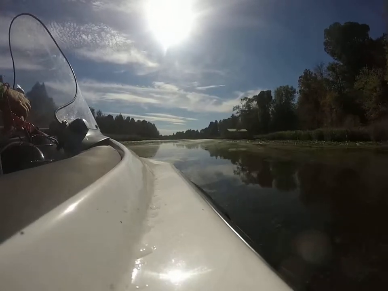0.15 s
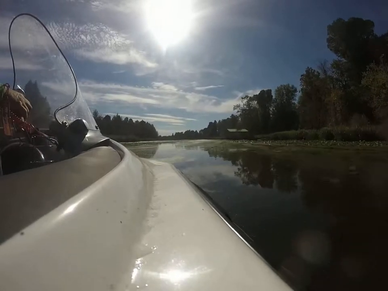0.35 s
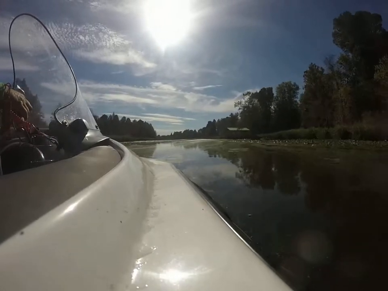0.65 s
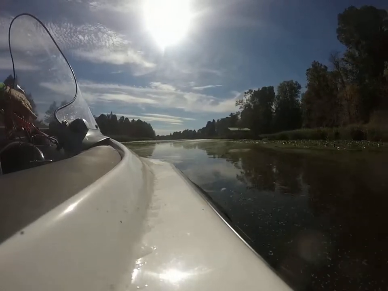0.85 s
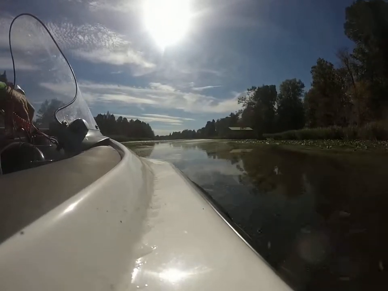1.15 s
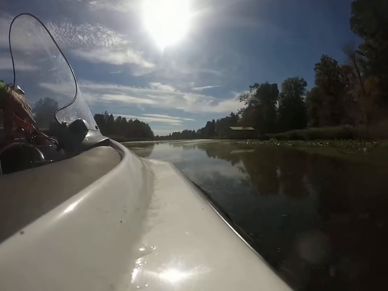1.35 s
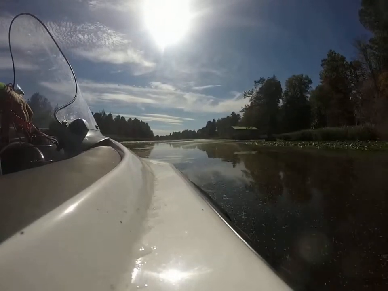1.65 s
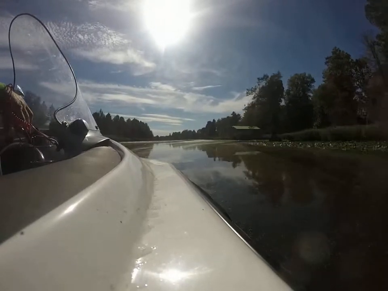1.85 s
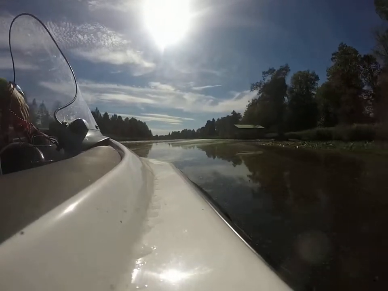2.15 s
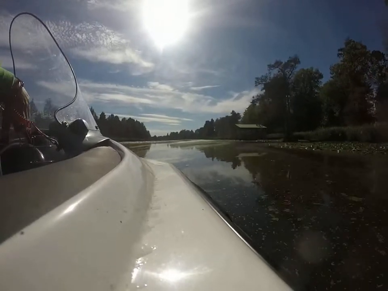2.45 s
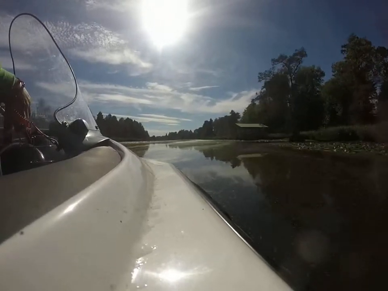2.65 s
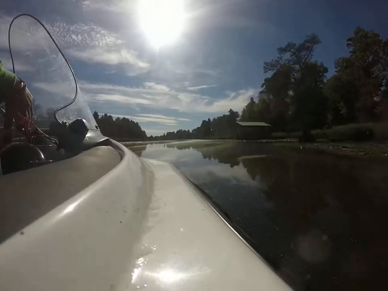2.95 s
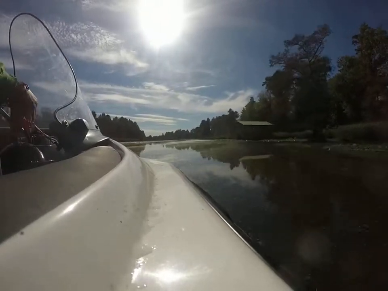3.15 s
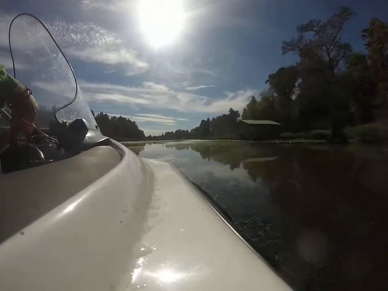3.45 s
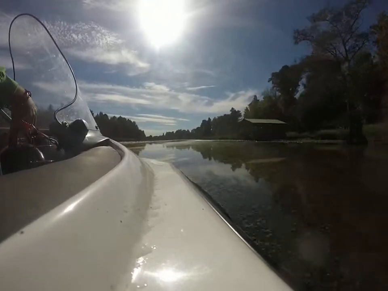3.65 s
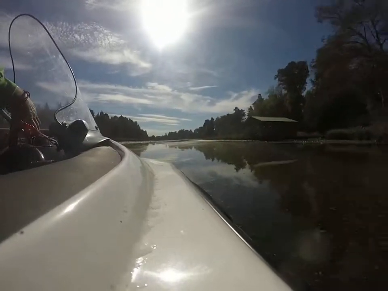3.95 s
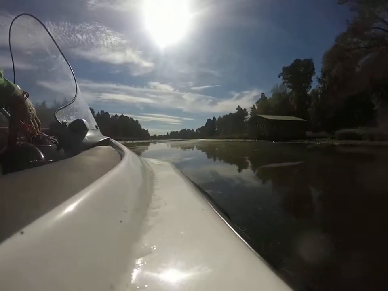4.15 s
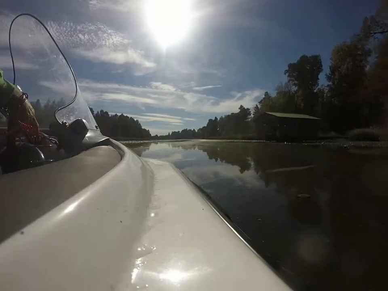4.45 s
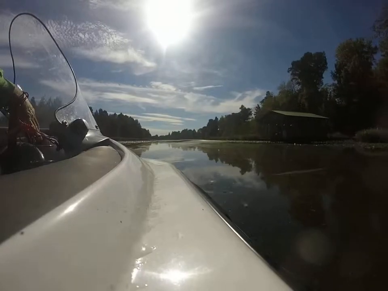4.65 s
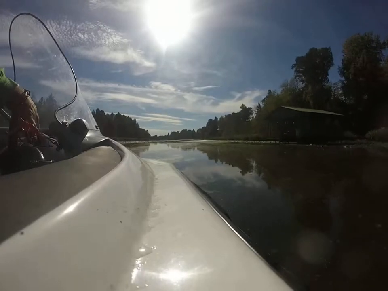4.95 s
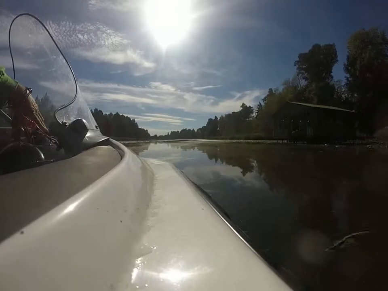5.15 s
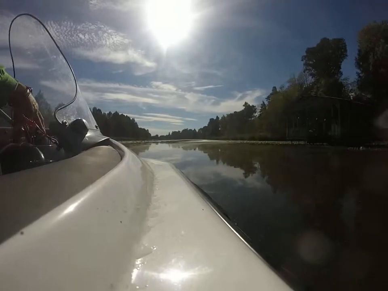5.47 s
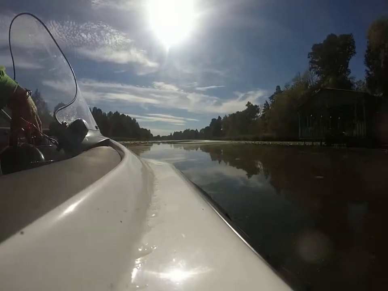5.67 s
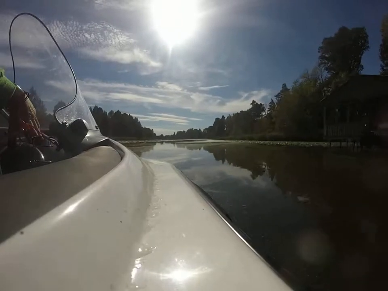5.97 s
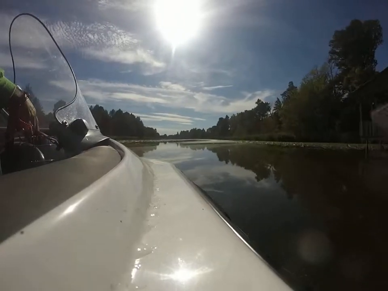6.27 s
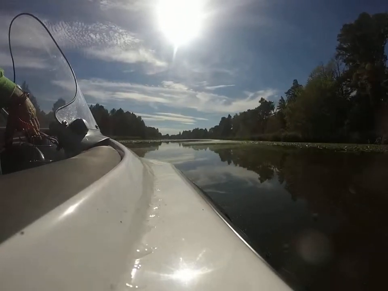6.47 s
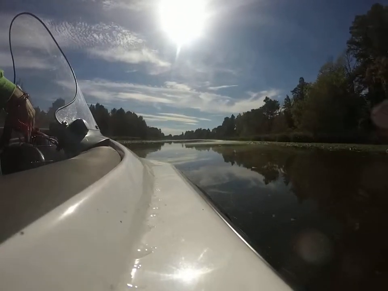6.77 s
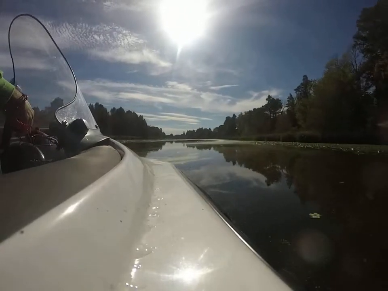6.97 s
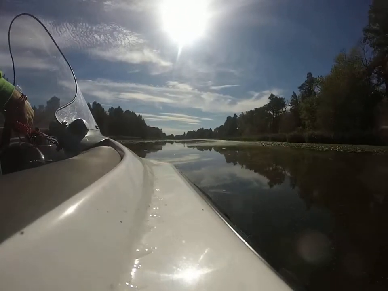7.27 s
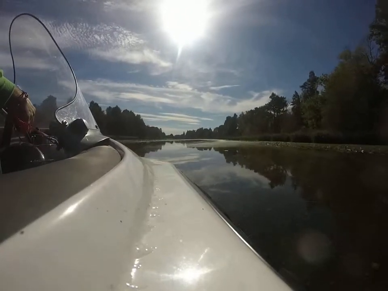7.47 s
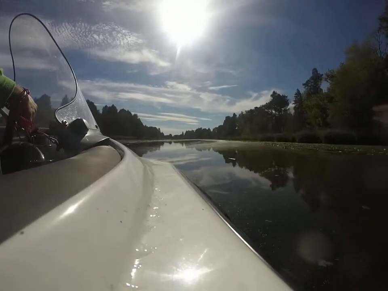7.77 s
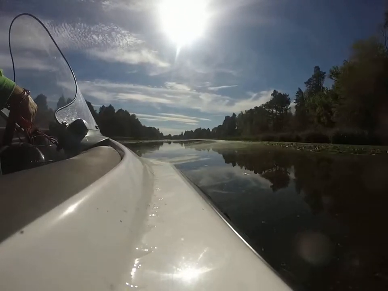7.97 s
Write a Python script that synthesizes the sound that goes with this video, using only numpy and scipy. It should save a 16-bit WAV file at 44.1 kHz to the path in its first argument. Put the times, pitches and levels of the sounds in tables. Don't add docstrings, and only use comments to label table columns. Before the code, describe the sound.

Heard from right on the hull, a strong low engine hum and rushing fan air continue unbroken, pulsing slightly and creeping up in pitch.

```python
import sys
import numpy as np
from scipy import signal
from scipy.fft import rfft, irfft, next_fast_len
from scipy.io import wavfile
from scipy.ndimage import uniform_filter1d

SR = 44100
rng = np.random.default_rng(int(sys.argv[2]) if len(sys.argv) > 2 else 0)


def transcribe(u):
    v = np.clip(np.atleast_2d(u).T, -1, 1)
    q = np.round(v * 32767).astype(np.int16)
    wavfile.write(sys.argv[1], SR, q)


def level_to_linear(level):
    exponent = np.asarray(level, float) / 20
    return 10 ** exponent


N = 358091

PANEL_RPM, BELT_RPM = 3955, 4010
CRANK_TEETH, FAN_TEETH, BLADES = 25, 64, 7


def in_time(rows):
    start_s, values = np.transpose(rows)
    return np.interp(np.arange(N) / SR, start_s, values)


def rms_one(x):
    return x / np.sqrt(np.mean(x ** 2) + 1e-20)


def above(rpm, threshold_rpm):
    settle_rpm = 12
    return 0.5 + 0.5 * np.tanh((rpm - threshold_rpm) / settle_rpm)


def drift(rate):
    r = np.exp(-80 * np.pi * rate / SR)
    noise = rng.standard_normal(N // 40 + 2002)
    slow = signal.lfilter([1], [1, -2 * r, r * r], noise)[2000:]
    return np.interp(np.arange(N) / 40, np.arange(len(slow)), rms_one(slow))


def air_noise(spectrum, patchy_db, rate, count):
    size = next_fast_len(N)
    log_hz = np.log(np.arange(size // 2 + 1) * SR / size + 1)
    hz, levels_db = np.transpose(spectrum)
    knots = np.log(hz)
    beyond = np.maximum(knots[0] - log_hz, 0) + np.maximum(log_hz - knots[-1], 0)
    colour_db = np.interp(log_hz, knots, levels_db) - 39 * beyond
    coloured = rfft(rng.standard_normal(size)) * level_to_linear(colour_db)
    centres = np.linspace(knots[0], knots[-1], count)
    out = np.zeros(N)
    for k in range(count):
        share = np.interp(log_hz, centres, np.arange(count) == k)
        band = irfft(coloured * share, size)[:N]
        out += band * level_to_linear(patchy_db * drift(rate))
    return rms_one(out)


def tone(cycle, order, level_db, wobble_db, lead=0.0):
    pipe_lag = 1.2
    phase = order * cycle - pipe_lag * abs(order - 2) + lead
    return np.sqrt(2) * level_to_linear(level_db + wobble_db * drift(5.0)) * np.cos(phase)


# start_s [s], level_db [dB about the mean]
AIR_FLOW = [(0, -0.4), (.9, -0.3), (1.75, -2.5), (1.88, 1), (2.3, -1.8), (2.5, 0.5), (3.0, 0.4),
            (3.3, -1.3), (3.55, 1.5), (3.95, -0.4), (4.5, 1.7), (5.1, -0.7), (5.6, 0.2), (5.9, -1.7),
            (6.3, 0.3), (6.85, -1.4), (7.3, 0.1), (8.12, -0.5)]


def air_flow():
    return in_time(AIR_FLOW)


# pitch_hz [Hz], level_db [dB per Hz]
CUSHION_SPECTRUM = [(8, -40.5), (24, -28), (36, -14.5), (47, -13), (53, -3), (57, 6), (62, 0), (70, -9.5),
                    (78, -9), (90, -19), (110, -15), (130, -17), (150, -24.5), (185, -23.5)]


def cushion(flow_db):
    level_db = -21 + 0.14 * flow_db
    evenness = 0.49
    boom = air_noise(CUSHION_SPECTRUM, patchy_db=3.0, rate=1.8, count=2)
    swell = uniform_filter1d(uniform_filter1d(boom ** 2, size=SR // 8), size=SR // 8)
    return level_to_linear(level_db) * rms_one(boom * (swell + 0.087) ** (-evenness / 2))


# pitch_hz [Hz], level_db [dB per Hz]
ROAR_SPECTRUM = [(150, -2), (200, -6.5), (230, -1), (550, -0.5), (820, -3), (950, 1), (1680, 1),
                 (1800, -2.5), (2100, -4), (2900, -9.5), (3750, -15), (4200, -18), (5100, -21.5),
                 (7000, -32.5)]


def fan_roar(flow_db, gust_db):
    roar = air_noise(ROAR_SPECTRUM, patchy_db=0.33, rate=6.9, count=8)
    return level_to_linear(-32.5 + flow_db + gust_db) * roar


# pitch_hz [Hz], level_db [dB per Hz]
CLATTER_SPECTRUM = [(3500, -14), (5000, 3), (5900, 0), (6800, -8), (8600, -8.5), (9600, -9.5), (10500, -8),
                    (11300, -12.5), (12300, -20.5), (14700, -23)]


def clatter(cycle, rpm, flow_db, gust_db):
    level_db = -55.5 + 0.77 * flow_db + 1.4 * above(rpm, PANEL_RPM) + gust_db
    puff_db = 2.3 * np.cos(cycle - 1.9)
    puff_db = puff_db + 1.3 * np.cos(2 * cycle + 0.7)
    puff_db = puff_db + 0.5 * np.cos(3 * cycle - 0.2)
    hiss = air_noise(CLATTER_SPECTRUM, patchy_db=0.2, rate=14.0, count=4)
    return level_to_linear(level_db) * rms_one(hiss * level_to_linear(puff_db + 0.66 * drift(25.0)))


# multiple [of the fan speed], level_db [dB]
FAN_SHAFT_LINES = [(1, -46), (3, -40.5), (5, -39), (9, -57), (14, -55), (21, -52.5), (28, -55.5), (35, -57),
                   (42, -60), (63, -57)]


def fan(cycle, rpm, flow_db):
    ratio = 2 * CRANK_TEETH / FAN_TEETH
    start_rad = 0.92
    overtone_db = 10 * (0.5 - above(rpm, BELT_RPM))
    out = tone(cycle, BLADES * ratio, -22.5 + 0.6 * flow_db, 0.41, lead=BLADES * start_rad)
    for multiple, level_db in FAN_SHAFT_LINES:
        k = round(multiple)
        line_db = level_db + overtone_db * (k == 2 * BLADES)
        out = out + tone(cycle, k * ratio, line_db, 0.9, lead=k * start_rad)
    return out


# start_s [s], speed_rpm [turns per minute]
CRANK_SPEED = [(0.0, 3927), (0.7, 3932), (1.25, 3911), (1.9, 3912), (2.35, 3900), (2.7, 3912), (3.4, 3980),
               (3.7, 3991), (4.2, 3993), (4.9, 4019), (6.3, 4026), (7.2, 4056), (8.12, 4060)]


def crank():
    rpm = in_time(CRANK_SPEED)
    cycle = np.cumsum(rpm) / 120 * 2 * np.pi / SR
    return rpm, cycle


# multiple [of the cycle rate], level_db [dB]
WEAK_ENGINE_LINES = [(5, -46.5), (6, -47.5), (7, -69), (8, -44.5), (9, -48.5), (10, -62), (12, -53),
                     (13, -59.5), (14, -60.5), (15, -58.5), (16, -57.5), (18, -53.5), (20, -58),
                     (21, -63.5), (24, -63), (25, -64), (26, -65.5), (31, -64.5), (32, -69), (38, -59.5),
                     (39, -64), (40, -55.5), (50, -47)]


def engine(cycle, rpm, flow_db):
    third_db = -28 - 11.5 * (1 - above(rpm, PANEL_RPM))
    belt_db = -7 * (1 - above(rpm, BELT_RPM))
    out = tone(cycle, order=2, level_db=-10.5, wobble_db=1.01)
    out = out + tone(cycle, order=1, level_db=-28, wobble_db=3.0)
    out = out + tone(cycle, order=3, level_db=third_db, wobble_db=1.2)
    out = out + tone(cycle, order=4, level_db=-27.5 + 0.7 * flow_db, wobble_db=1.2)
    for multiple, level_db in WEAK_ENGINE_LINES:
        line_db = level_db + belt_db * (multiple > 30)
        out = out + tone(cycle, round(multiple), line_db, 1.2)
    return out


def scene():
    rpm, cycle = crank()
    flow_db = air_flow()
    gust_db = 0.1 * drift(3.4)
    air = cushion(flow_db) + fan_roar(flow_db, gust_db) + clatter(cycle, rpm, flow_db, gust_db)
    mix = air + fan(cycle, rpm, flow_db) + engine(cycle, rpm, flow_db)
    return mix[None]


# pitch_hz [Hz], width_hz [Hz], lift_db [dB]
CASE_RESONANCES = [(1340, 300, 1), (3166, 130, 5.5), (3445, 151, 9.5), (4290, 150, 4), (5120, 260, -10),
                   (5590, 340, 2.5), (5920, 120, -4), (6160, 150, 3.5), (7630, 360, 9.5), (12300, 500, -4),
                   (12900, 600, 5.5), (15100, 300, -7.5)]


def camera_case(x):
    for hz, width_hz, lift_db in CASE_RESONANCES:
        r = np.exp(-np.pi * width_hz / SR)
        feed = (1 - r * r) / 2 * np.array([1, 0, -1])
        ring = signal.lfilter(feed, [1, -2 * r * np.cos(2 * np.pi * hz / SR), r * r], x)
        x = x + (level_to_linear(lift_db) - 1) * ring
    return x


def gain_control(x):
    slope, lag_s = 0.79, 0.007
    rest_db, release_db_s = -5.5, 74
    ramp_db = release_db_s * np.arange(N) / SR
    level_db = np.maximum(20 * np.log10(np.abs(x) + 1e-9), rest_db - 1.5 - ramp_db)
    held_db = np.maximum.accumulate(level_db + ramp_db, axis=-1) - ramp_db
    r = np.exp(-1 / (lag_s * SR))
    return x * level_to_linear(-slope * signal.lfilter([1 - r], [1, -r], held_db - rest_db))


def roll_off(x):
    return signal.sosfilt(signal.butter(12, 15140, fs=SR, output="sos"), x)


def record(dry):
    soft_top = 1.7
    x = gain_control(camera_case(dry))
    return roll_off(soft_top * np.tanh(x / soft_top))


dry = scene()
out = record(dry)
transcribe(out)
```